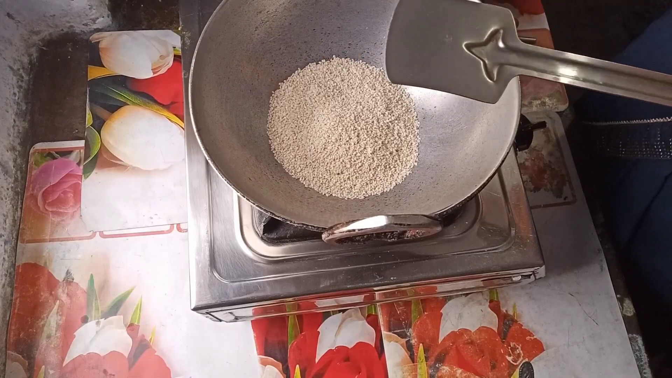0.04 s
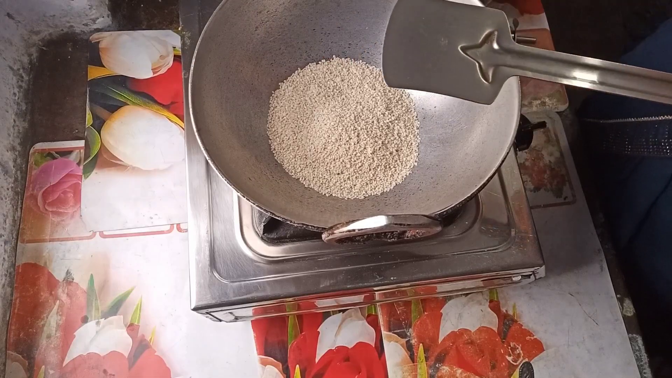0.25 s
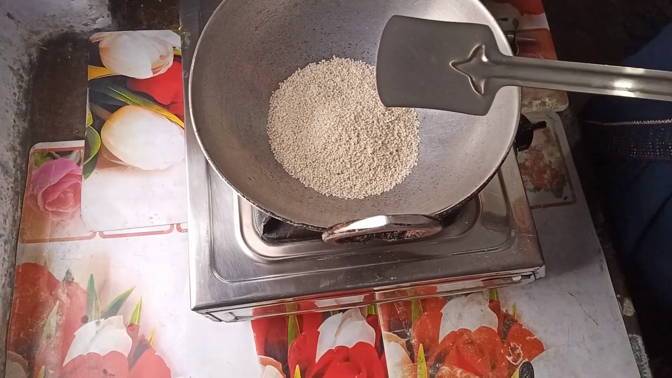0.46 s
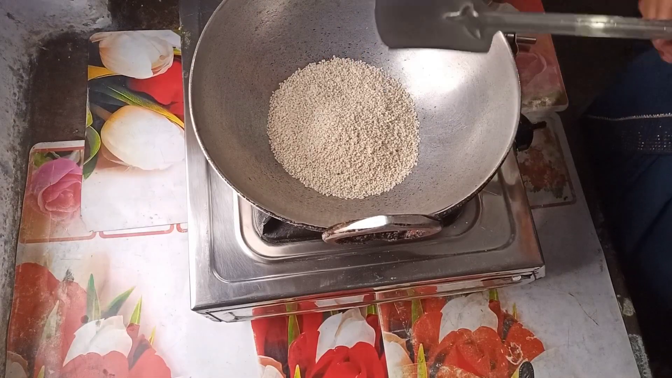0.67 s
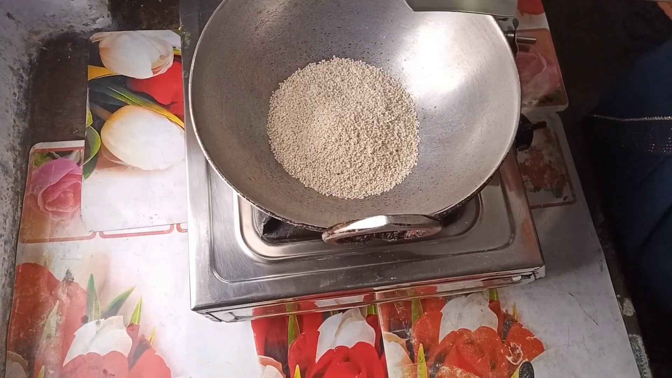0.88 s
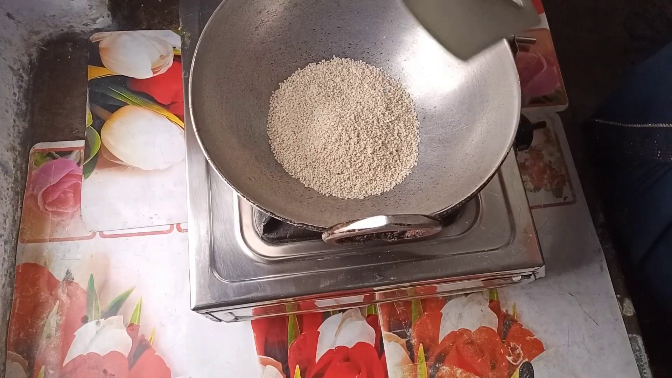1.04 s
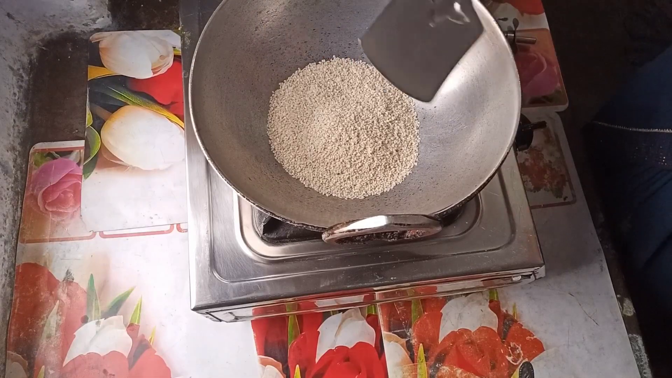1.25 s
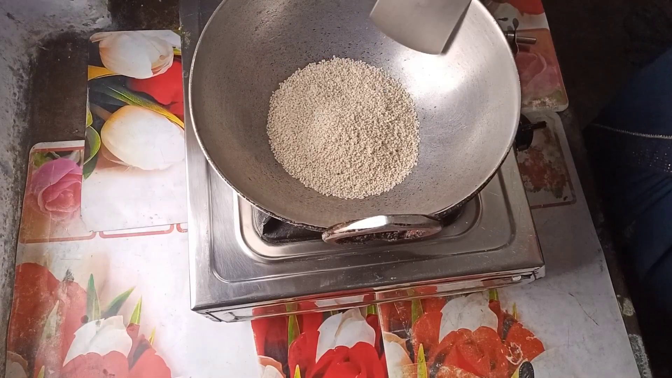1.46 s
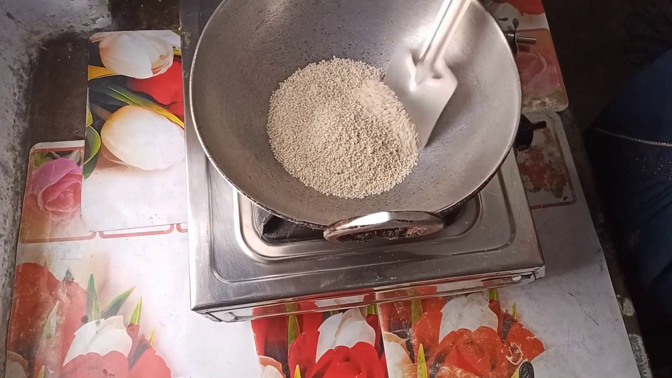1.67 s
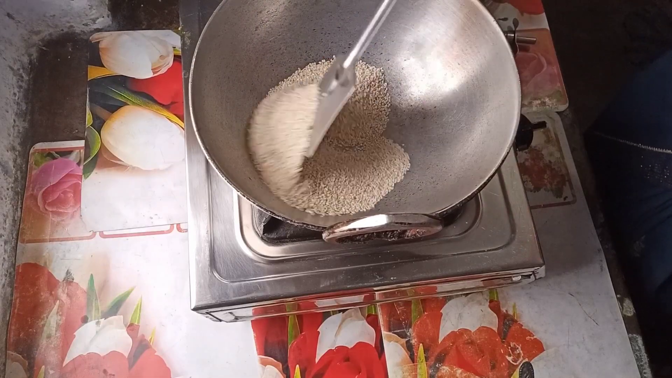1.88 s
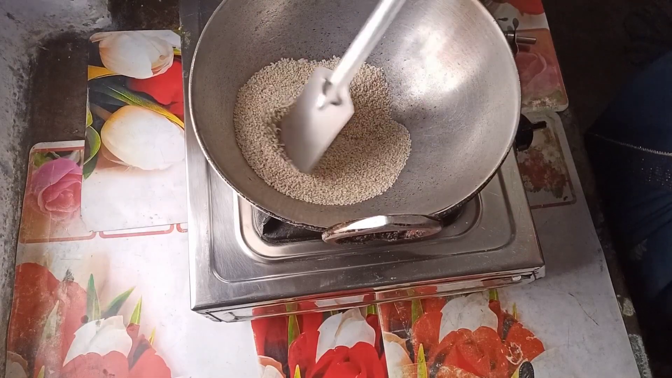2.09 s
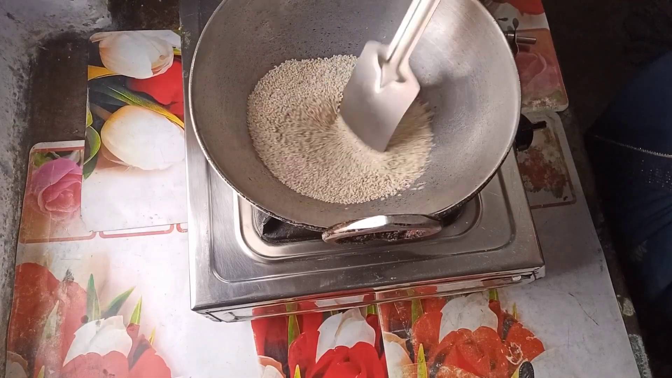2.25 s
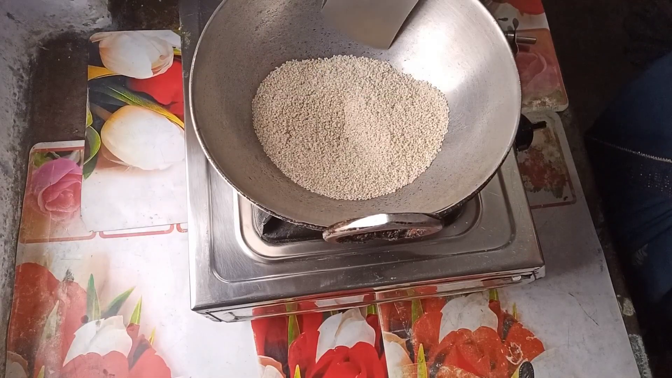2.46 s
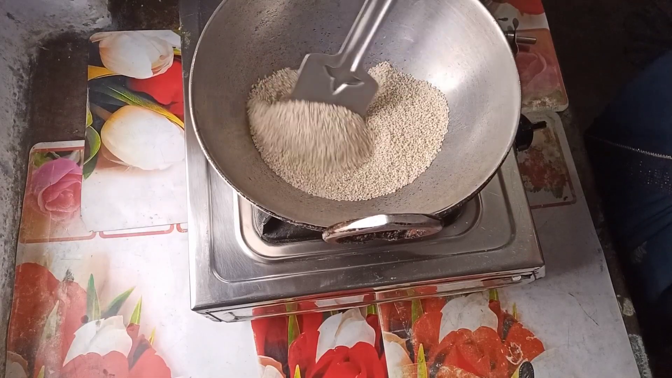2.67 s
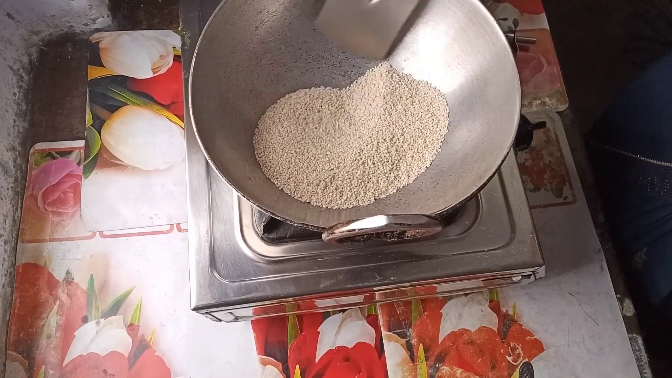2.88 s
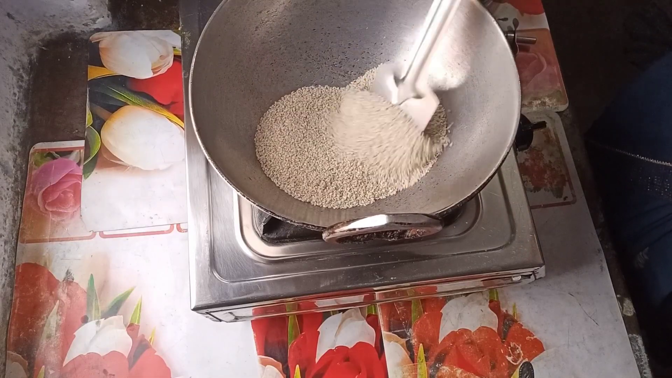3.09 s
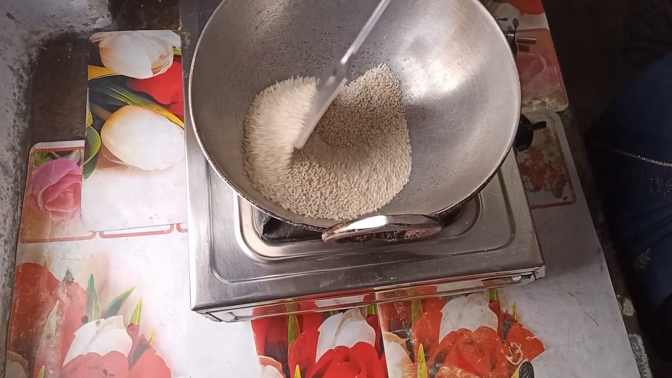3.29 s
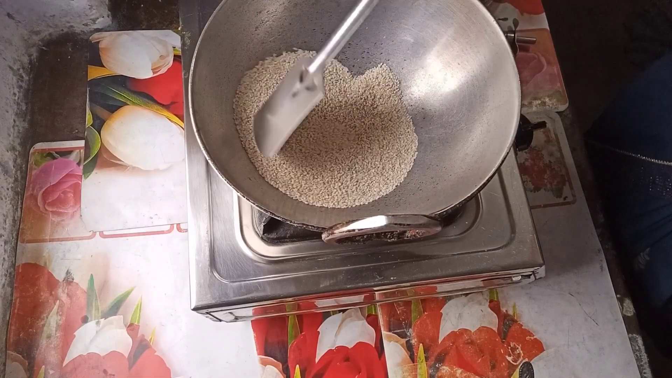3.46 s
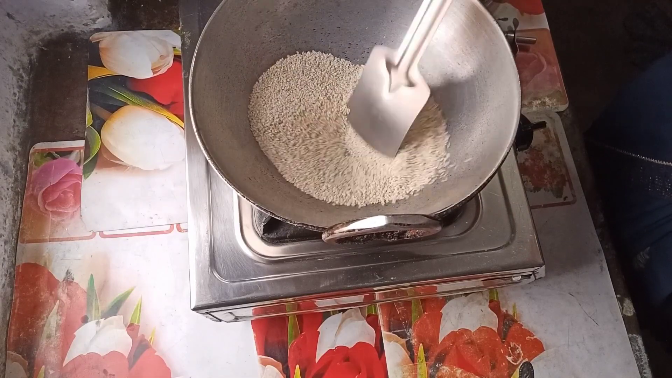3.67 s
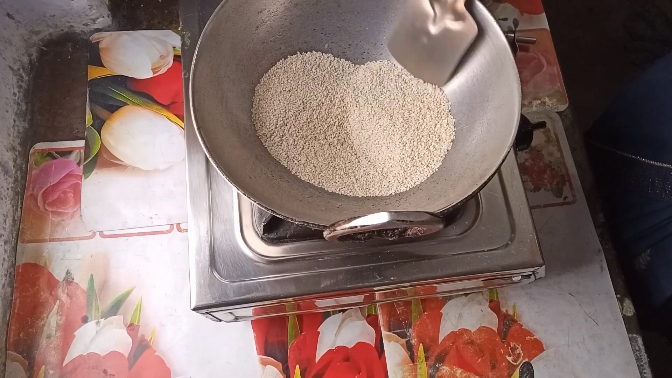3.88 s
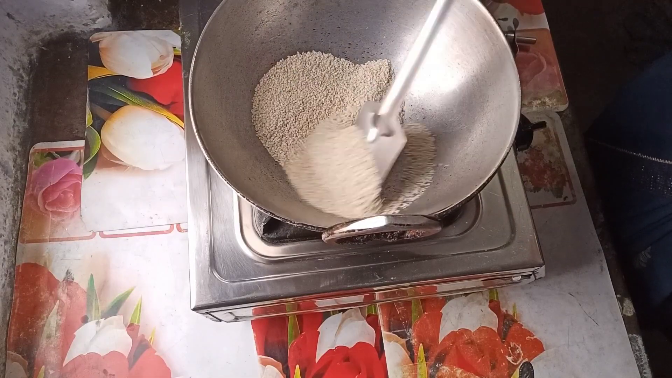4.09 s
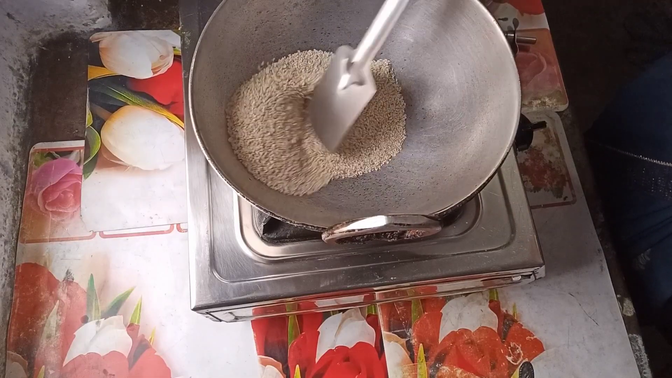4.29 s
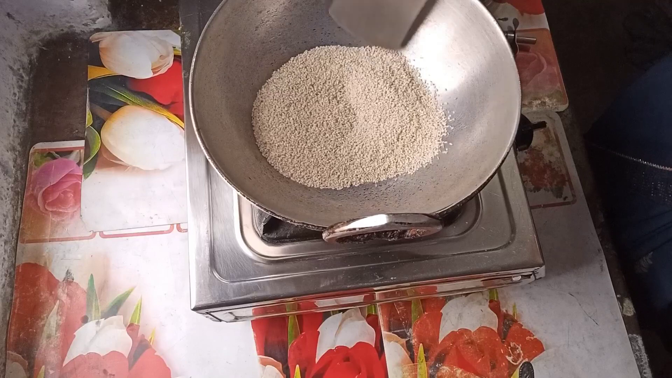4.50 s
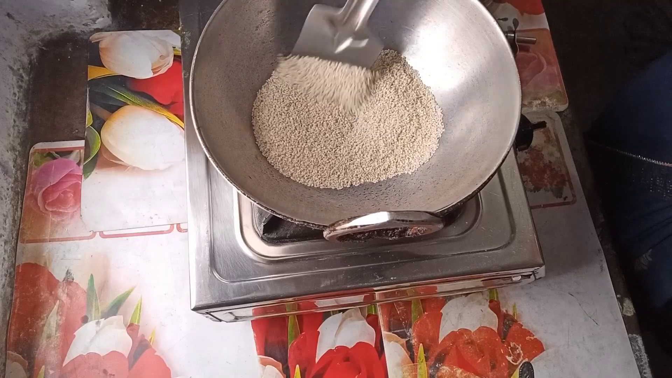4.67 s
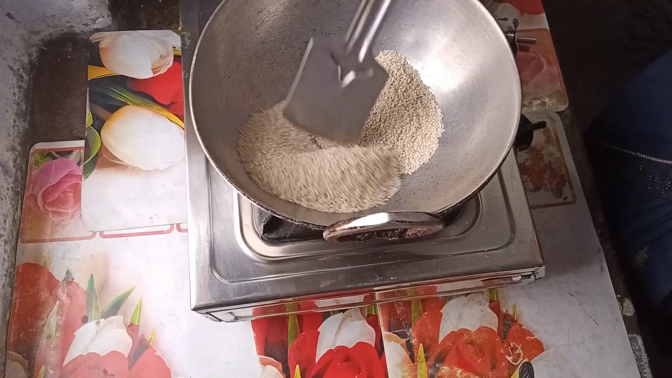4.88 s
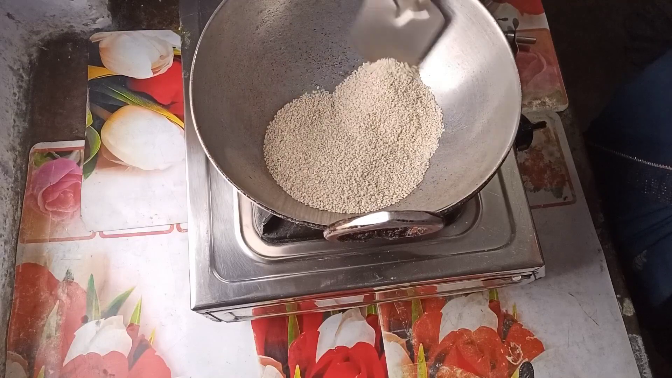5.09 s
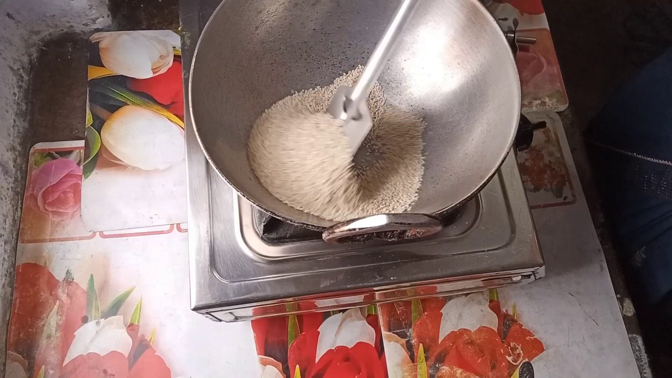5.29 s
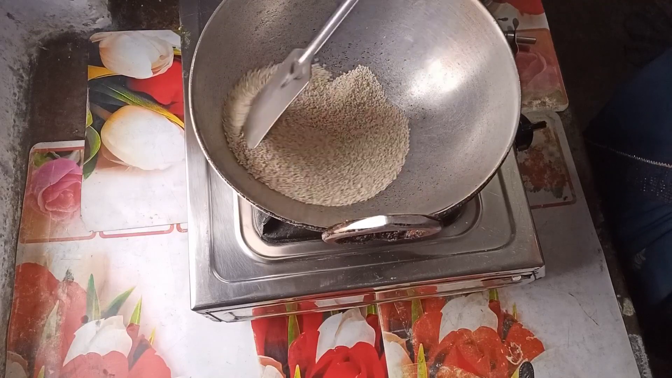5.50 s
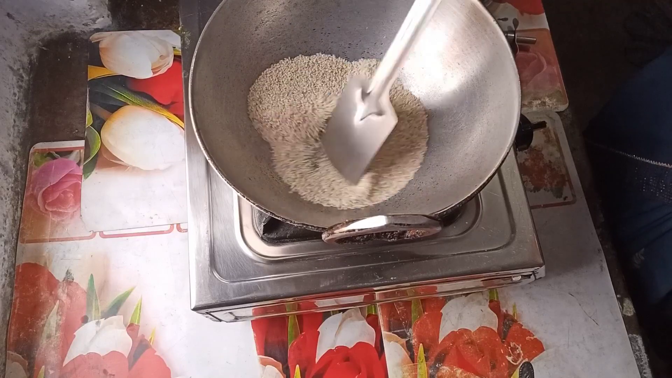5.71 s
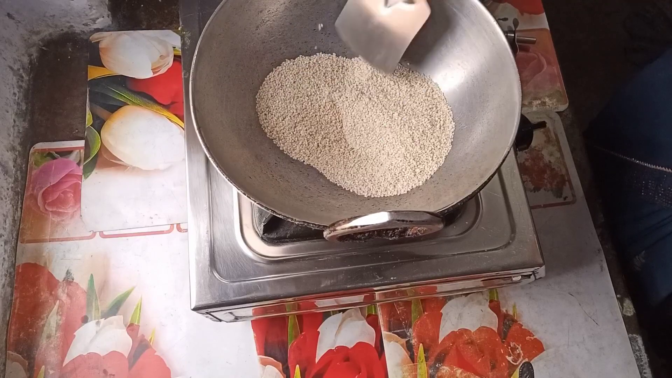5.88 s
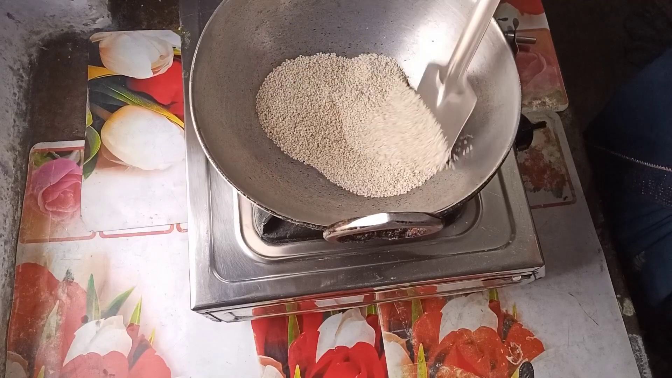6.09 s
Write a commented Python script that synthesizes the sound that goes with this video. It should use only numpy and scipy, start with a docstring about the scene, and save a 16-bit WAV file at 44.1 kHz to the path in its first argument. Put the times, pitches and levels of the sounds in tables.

```python
"""A low gas flame rushes under a round metal pan of dry seeds, heard from just above; a dull bump shakes
the stove (filtered noise with a dying ring), two dull rattles click with it, then a few lone seeds hop.
Then, stroke after stroke, a steel spatula strikes the wall (noise shell, damped modes, notes), scrapes
down it (stick-slip impulses ringing steel) and ploughs the heap: the pan rumbles under the blade and the
seeds hiss as they slide back (both filtered random impacts). Metal sounds leave a short room tail."""
import sys
import numpy as np
from scipy import signal
from scipy.fft import rfft, irfft, next_fast_len
from scipy.io import wavfile
from scipy.ndimage import map_coordinates

SR = 44100
rng = np.random.default_rng(int(sys.argv[2]) if len(sys.argv) > 2 else 0)


def persist_wave(psi):
    """Save psi, clipped to +-1, as 16-bit WAV."""
    counts = np.round(np.clip(psi, -1, 1) * 32767).astype(np.int16)
    wavfile.write(sys.argv[1], SR, np.atleast_2d(counts).T)


N = 271170


def amp(db):
    """Linear gain of a level in dB."""
    return 10 ** (np.asarray(db) / 20)


def unit(x):
    """Scale a sound to rms 1."""
    return x / np.sqrt(np.mean(x ** 2) + 1e-20)


def onset_unit(x):
    """Scale a blow to rms 1 over its first 20 ms."""
    return x / np.sqrt(np.mean(x[..., :SR // 50] ** 2))


def add(track, s, sound):
    """Mix a sound into the track at time s."""
    part = track[:, max(round(s * SR), 0):][:, :sound.shape[-1]]
    part += sound[..., :part.shape[-1]]


def along(points, hz):
    """Interpolate (Hz, value) points on a log frequency axis."""
    f, v = np.transpose(points)
    return np.interp(np.log(hz + 1), np.log(f + 1), v)


def below(hz, edge_hz):
    """1 under the edge, 0 over it, with a soft step."""
    return 1 / (1 + (hz / edge_hz) ** 8)


def lift(resonances, hz):
    """The gain in dB that (Hz, width, dB) resonances give."""
    return sum(db / (1 + (2 * (hz - f) / w) ** 2) for f, w, db in resonances)


def coloured(x, gain_db):
    """Put x through the causal, minimum-phase filter whose gain is gain_db(Hz)."""
    n = x.shape[-1]
    m = 2 * next_fast_len(n // 2 + 4096)
    gain = amp(gain_db(np.fft.rfftfreq(m, 1 / SR)))
    cepstrum = irfft(np.log(gain + 1e-6))
    # fold the cepstrum onto positive time to make the filter causal
    cepstrum[1:m // 2] *= 2
    cepstrum[m // 2 + 1:] = 0
    return irfft(rfft(x, m) * np.exp(rfft(cepstrum)), m)[..., :n]


def wobble(rate, size=N):
    """A smooth random curve, rate knots a second."""
    knots = rng.standard_normal(int(size * rate / SR) + 4)
    return map_coordinates(knots, [np.arange(size) * rate / SR])


def swells(rows):
    """The summed gain of smooth bell-shaped swells, each (middle s, half length s, dB)."""
    t = np.arange(N) / SR
    return sum(amp(db) * np.exp(-((t - s) / half) ** 2) for s, half, db in rows)


def contacts(rate, spread_db, size):
    """Tiny impacts at random times, rate a second, of uneven strength."""
    happens = rng.random(size) < rate / SR
    strength = amp(spread_db * np.clip(rng.standard_normal(size), -2, 2))
    return unit(happens * strength * rng.standard_normal((2, size)))


def dying(t60s):
    """Two crowds of modes too dense to tell apart, each band dying at its own speed."""
    hz, t, z = signal.stft(rng.standard_normal((2, SR * 3 // 4)), SR, nperseg=256)
    fade = amp(-60 * t / along(t60s, hz)[:, None])
    return signal.istft(z * fade, SR, nperseg=256)[1]


def touch_point(hz, depth_db, spacing_hz):
    """Each point of contact favours some clusters of modes and misses others (dB)."""
    favour = map_coordinates(rng.standard_normal(1024), [hz / spacing_hz], mode="mirror")
    return depth_db * np.clip(favour, -2, 1.5)


def spread(side, edge_hz, db):
    """The part of a sound that differs between the ears: treble only."""
    return coloured(side, lambda hz: db - 45 * below(hz, edge_hz) ** 2)


# the small hard room's decay: f/Hz, t60/s
ROOM_DECAY = [(200, 0.59), (3000, 0.44), (7000, 0.37), (14000, 0.27)]


def kitchen(x):
    """The short tail of a small hard room: the middle signal, a little late, through dying noise."""
    tail = dying(ROOM_DECAY)
    late = np.pad(x[0], (SR // 150, 0))[None]
    return signal.fftconvolve(late, tail / np.linalg.norm(tail[0]), axes=1)[:, :N]


# low resonances of the pan on its stand: f/Hz, width/Hz, lift/dB
PAN_RESONANCES = [(84, 6.4, 7.5), (119.6, 9.9, 9), (181.8, 19.6, 8.5), (251.4, 51, 11.5), (334.2, 25, 9.5),
                  (522, 26, 6), (585, 9.4, 12.5), (678, 57, 10), (800.6, 20, 7), (860, 9.6, 6),
                  (1047, 24, 2), (1238, 26, 9.5)]


def hollow(hz):
    """The lift in dB from the pan's low resonances."""
    return lift(PAN_RESONANCES, hz)


# burner spectrum: f/Hz, relative level/dB per Hz
FLAME_SPECTRUM = [(20, -20), (45, -6), (80, -1), (130, 1), (260, -4.5), (430, -3), (700, -12.5),
                  (1000, -18.5), (1800, -23), (3300, -24.5), (6500, -21.5), (8500, -28.5), (15000, -29)]


def flame(level_db=-62, pan_share=0.17):
    """The low, steady rush of the burner: noise that takes on a share of the pan's resonances."""
    rush = coloured(rng.standard_normal((2, N)), lambda hz: along(FLAME_SPECTRUM, hz) + pan_share * hollow(hz))
    return amp(level_db) * unit(rush)


# the stove is jolted and settles: t/s, level/dB, treble tilt/dB
BUMP_EVENTS = [(0.172, -27.5, -0.5), (.325, -35.5, -13.5), (.352, -38, -14)]
# struck stove spectrum: f/Hz, relative level/dB per Hz
STOVE_SPECTRUM = [(50, -50), (90, 5), (120, 10), (170, -5.5), (260, 3), (380, 2), (500, -4.5), (900, -3),
                  (1150, -4.5), (1400, 1.5), (1850, -6.5), (2700, -19.5), (6500, -19.5), (9000, -35.5)]
# the stove's ring: f/Hz, t60/s
STOVE_DECAY = [(120, 0.59), (400, 0.46), (1500, 0.49), (6000, 0.25)]
# resonances of the stove's panels: f/Hz, width/Hz, lift/dB
STOVE_PANELS = [(102, 6.6, -14), (141, 7.2, 3), (245.8, 7.3, 10.5), (390, 43, 4.5), (476, 22, -3),
                (576, 14, 10.5), (1845, 60, 9.5)]


def bumps(attack=0.001):
    """Soft, heavy knocks set the stove's sheet metal booming; attack in s."""
    out = np.zeros((2, N))
    for s, db, treble_db in BUMP_EVENTS:
        def colour(hz):
            treble = treble_db * (1 - below(hz, 940))
            return along(STOVE_SPECTRUM, hz) + lift(STOVE_PANELS, hz) + treble
        boom = coloured(dying(STOVE_DECAY), colour)
        rise = 1 - np.exp(-np.arange(boom.shape[1]) / SR / attack)
        add(out, s, amp(db) * onset_unit(boom) * rise)
    return out


# the blade's weight sets the bowl booming: t/s, relative level/dB
BOOM_EVENTS = [(1.553, -32.5), (2.198, -43), (4.172, -38), (5.101, -55)]
# the bowl's lowest modes: f/Hz, relative level/dB, t60/s
BOWL_MODES = [(187.5, -3, 0.29), (256, -21, 0.14), (329, -3, 0.5)]


def booms(swell=0.01):
    """The bowl's lowest modes swell (swell in s) and die away."""
    out, t = np.zeros((2, N)), np.arange(SR // 2) / SR
    ring = sum(amp(db - 60 * t / t60) * np.sin(2 * np.pi * hz * t) for hz, db, t60 in BOWL_MODES)
    for s, db in BOOM_EVENTS:
        add(out, s, amp(db) * 2 * ring * (1 - np.exp(-t / swell)))
    return out


# small clicks: two dull rattles as the stove is bumped, then lone seeds hopping:
# t/s, relative level/dB, edge tilt/dB
SMALL_CLICKS = [(0.314, -34.5, -36), (0.349, -27.5, -44), (0.8949, -52, 9), (0.9612, -42.5, -6),
                (0.981, -32, -8), (1.022, -44, 4), (1.3155, -34.5, 8), (1.3742, -28, -6),
                (3.4704, -26.5, 4), (4.4707, -28, -24)]
# seed spectrum, for small clicks and for the sliding heap: f/Hz, relative level/dB per Hz
SEED_SPECTRUM = [(650, -61), (1100, -28), (1500, -14), (2700, -22.5), (3500, -6), (4050, -12.5),
                 (4600, -0.5), (5600, 5), (7100, 7.5), (8600, -6), (10000, -5.5), (12100, -7.5),
                 (14200, -8.5), (16000, -32)]


def ticks(level_db=-15, ring_db=-24, edge_db=7):
    """Rattles and lone seeds click, the pan ringing faintly: a short and a longer noise decay."""
    out, t = np.zeros((2, N)), np.arange(SR // 8) / SR
    for s, db, edge in SMALL_CLICKS:
        fade = amp(-60 * t / 0.013) + amp(ring_db - 60 * t / 0.46)
        click = rng.standard_normal((2, len(t))) * fade
        click = coloured(click, lambda hz: along(SEED_SPECTRUM, hz) + (edge + edge_db) * (1 - below(hz, 7800)))
        add(out, s, amp(db + level_db) * onset_unit(click))
    return out


# the blade pushes into the heap, eases off on the way back and lifts (levels are relative):
# t/s, push/s, way back/s, hiss level/dB, rocking level/dB, drone level/dB, crunch level/dB
STIR_STROKES = [(1.193, 0.14, .12, -65, -48.5, -60.5, -59), (1.539, .65, 0.16, -34.5, -51.5, -46, -44),
                (2.528, 0.3, 0.2, -45, -52, -44.5, -44), (2.977, 0.27, 0.56, -35, -50, -42.5, -41.5),
                (3.96, 0.44, 0.14, -38, -50.5, -44.5, -42.5), (4.635, .38, 0.046, -37, -49.5, -44, -41.5),
                (5.097, 0.43, 0.35, -32, -50, -44, -43), (5.948, 0.11, 0.037, -57.5, -53, -49, -44.5),
                (6.071, 0.22, .05, -38, -57, -42.5, -41)]
GRIP_S, EASE_S, LIFT_DB_PER_S = 0.034, 0.19, 234  # the blade takes hold, eases off; the fade once it lifts
DRONE_EASE_DB, CRUNCH_EASE_DB, ROCK_EASE_DB = 10, 11.5, 2.5  # how far each softens as the blade eases
GATHER_S, SETTLE_DB_PER_S = .1, 13.5  # seeds get moving, then thin out ahead of the blade


def stirring():
    """Gains of hiss, rocking, drone and crunch: each stroke takes hold, pushes, eases off and lifts."""
    start, push, back, hiss_db, rock_db, drone_db, crunch_db = np.transpose(STIR_STROKES)[:, :, None]
    t = np.maximum(np.arange(N) / SR - start, 0)
    lifted = amp(-LIFT_DB_PER_S * np.maximum(t - push - back, 0))
    eased = np.clip((t - push) / EASE_S, 0, 1)
    grip = np.minimum(t / GRIP_S, 1)
    hiss = np.minimum(t / GATHER_S, 1) * amp(hiss_db - SETTLE_DB_PER_S * t)
    rock = grip * amp(rock_db - ROCK_EASE_DB * eased)
    drone = grip * amp(drone_db - DRONE_EASE_DB * eased)
    crunch = grip * amp(crunch_db - CRUNCH_EASE_DB * eased)
    # the loudest stroke wins at every moment
    return [np.max(gain * lifted, axis=0) for gain in (hiss, rock, drone, crunch)]


# the pan rocks on its stand: f/Hz, relative level/dB per Hz
ROCKING_SPECTRUM = [(25, -5), (45, -4.5), (65, -14), (80, -1), (120, -9), (145, -17.5), (220, -31)]
# the pan drones under the blade: f/Hz, relative level/dB per Hz
DRONE_SPECTRUM = [(90, -43), (150, -4.5), (180, 0), (260, -6.5), (340, -1), (420, -12), (600, -36.5)]
# seeds roll and crunch under the blade: f/Hz, relative level/dB per Hz
CRUNCH_SPECTRUM = [(280, -38.5), (420, 3), (560, 1), (720, -3), (950, -6), (1300, -14.5), (2200, -11),
                   (3200, -21.5), (5000, -49.5)]
# jammed seeds grind higher: f/Hz, relative level/dB per Hz
JAMMED_SPECTRUM = [(230, -30), (330, -1.5), (470, -1), (620, -3.5), (800, 0.5), (1000, -5.5), (1400, -11.5),
                   (2200, -16), (3200, -17), (5000, -43)]
# seeds jam under the blade and are ground along: middle t/s, half length/s, level/dB
JAM_SWELLS = [(2.68, 0.027, -39), (3.155, 0.028, -38.5), (4.285, 0.051, -30.5), (5.39, .1, -36)]


def plough(rock, drone, crunch, drone_db=-.5, crunch_db=-2.0, lumps_db=1.1):
    """Seeds roll and jam under the blade; their random impacts shake the pan's low resonances."""
    def shaken(shape):
        hits = contacts(2500, spread_db=2.0, size=N)
        return unit(coloured(hits, lambda hz: along(shape, hz) + hollow(hz)))
    roll = crunch * amp(crunch_db + lumps_db * wobble(30)) * shaken(CRUNCH_SPECTRUM)
    rumble = rock * shaken(ROCKING_SPECTRUM) + drone * amp(drone_db) * shaken(DRONE_SPECTRUM)
    grind = swells(JAM_SWELLS) * shaken(JAMMED_SPECTRUM)
    return rumble + roll + grind


# heaped seeds slide back down the wall: middle t/s, half length/s, relative level/dB
SEED_SLIDES = [(.355, 0.08, -53.5), (2.28, 0.084, -34.5), (3.43, .05, -40.5), (3.68, 0.094, -34.5),
               (4.44, 0.095, -34.5), (5.79, .11, -36)]
REST_DB = -76.5  # the faint hiss of the heap at rest, relative like the slides


def seeds(stirred, level_db=-1, flutter_db=0.84, hop_db=-12):
    """Seeds pour over each other, the denser the more of them move; a few hop on metal with brighter clicks."""
    flow = np.hypot(stirred, swells(SEED_SLIDES)) + amp(REST_DB)
    rate = 6000 + 20000 * np.sqrt(flow / flow.max())  # impacts a second
    # the division keeps the loudness even as the patter thickens
    patter = contacts(rate, spread_db=3, size=N) / np.sqrt(rate)
    touch = lambda hz: touch_point(hz, depth_db=4.0, spacing_hz=71.1)
    hiss = coloured(patter, lambda hz: along(SEED_SPECTRUM, hz) + touch(hz))
    hops = contacts(350, spread_db=2, size=N)
    hops = coloured(hops, lambda hz: along(SEED_SPECTRUM, hz) - 8 * below(hz, 8300))
    flutter = amp(level_db + flutter_db * wobble(30))
    return flow * flutter * (unit(hiss) + amp(hop_db) * unit(hops))


# the flat of the blade rubs with a hoarse whistle:
# start t/s, end t/s, start f/Hz, end f/Hz, level/dB, width/Hz (rate of the random wander)
BLADE_RUBS = [(1.323, 1.473, 3510, 2490, -57.5, 1012), (1.664, 1.824, 3440, 3370, -54, 60),
              (2.609, 2.715, 1763, 1733, -34, 107), (2.613, 2.716, 4640, 4860, -26, 70),
              (3.412, 3.641, 3200, 3400, -51, 888), (3.718, 3.84, 1420, 1406, -55, 412),
              (4.037, 4.6, 2080, 2067, -53, 255.6)]


def rubs():
    """Friction feeds one hoarse resonance, which shifts and stutters as the blade travels."""
    out = np.zeros((2, N))
    for start, end, start_hz, end_hz, db, width_hz in BLADE_RUBS:
        hz = np.linspace(start_hz, end_hz, int(max(end - start, .02) * SR))
        size = len(hz)
        hoarse = wobble(width_hz, size=size) + 1j * wobble(width_hz, size=size)
        stutter = amp(3 * wobble(70, size=size))
        carrier = np.exp(2j * np.pi * np.cumsum(hz) / SR)
        whistle = unit(stutter * np.real(hoarse * carrier))
        arch = np.sin(np.linspace(0, np.pi, size))
        add(out, start, amp(db) * arch * whistle)
    return out


# ring of blade and pan, before damping and scatter: f/Hz, relative level/dB, t60/s
STEEL_MODES = [(1265, -15.5, 0.37), (1394, -12.5, 0.48), (1780, -8.5, 0.6), (2275, -10.5, .35),
               (2300, -12, .5), (2666, 7, 0.036), (3210, -9, .3), (3460, -2, 0.19), (3930, 2.5, .15),
               (4550, 0.5, .25), (4940, -1.5, 0.23), (5000, 0.5, 0.14), (5300, -1, .2), (5500, -2.5, 0.66),
               (5700, 12, 0.33), (6100, 1, 0.13), (6100, 9.5, 0.24), (6300, 4, 0.19), (6970, -1.5, 0.38),
               (7340, 9, 0.4), (7830, -2, .2), (9830, 2, .22), (12800, -15, .16), (13900, -6, .18),
               (14840, -17, .2)]


def steel(damping, scatter_db):
    """The steel's clear modes; their strengths depend on where the blade touches."""
    t = np.arange(SR // 2) / SR
    hz, db, t60 = np.transpose(STEEL_MODES)[:, :, None]
    sizes = amp(db + scatter_db * rng.uniform(-2.8, 1, hz.shape))
    fade = amp(-60 * t * damping / t60)
    modes = sizes * fade * np.sin(2 * np.pi * (hz * t + rng.random(hz.shape)))
    side = rng.choice([-1, 1], len(modes)) @ modes
    return np.array([modes.sum(0), side])


# blade edge scrapes the metal, or briefly catches it through the seeds with a dull knock:
# t/s, length/s, level/dB, low grating tilt/dB
EDGE_SCRAPES = [(0.342, 0.024, -46, 6), (1.668, .025, -25.5, -6.5), (1.846, .02, -45.5, 49),
                (1.964, 0.012, -37.5, 3.5), (2.045, 0.017, -48.5, 20), (2.113, .017, -49.5, 16),
                (2.195, 0.024, -39, -1.5), (2.554, 0.096, -33, -4), (2.614, 0.023, -20, -6),
                (2.636, 0.041, -18, -2.5), (2.863, .021, -49, 13), (3.023, .045, -27, -11),
                (3.134, 0.054, -19.5, -6), (4.046, 0.012, -21.5, -12), (4.191, 0.11, -31, -18),
                (4.248, 0.11, -31.5, -5), (4.725, 0.034, -33.5, -7), (4.817, 0.016, -26.5, -1),
                (4.871, 0.025, -39.5, 3.5), (5.137, 0.034, -26, -9), (5.24, 0.047, -18, -5),
                (5.383, 0.062, -37.5, 7), (6.11, 0.032, -28, -11)]
# scraped steel spectrum: f/Hz, relative level/dB per Hz
GRATING_SPECTRUM = [(200, -56), (700, -6), (1200, -12), (1800, -7), (3200, -7), (4600, -2), (6200, 2),
                    (7300, -1), (8300, -14.5), (11000, -15), (12200, -19), (14200, -21), (15500, -40)]
BITE_SHARE = 0.19  # the part of a scrape over which the pressure builds


def scrapes(slip_rate=2500, release_t60=0.19, clear_db=-7, held_t60=0.085):
    """The edge sticks and slips; each slip rings the steel, damped by the pressure of the hand."""
    out, t = np.zeros((2, N)), np.arange(SR // 2) / SR
    for s, length, db, low_db in EDGE_SCRAPES:
        bite = np.minimum(t / (BITE_SHARE * length), 1)
        pressure = bite * amp(-60 * np.maximum(t - length, 0) / release_t60)
        slips = contacts(slip_rate, spread_db=1.0, size=len(t))[0]
        body = rng.standard_normal((2, len(t))) * amp(-60 * t / held_t60)
        touch = lambda hz: touch_point(hz, depth_db=-1.5, spacing_hz=113.2)
        body = coloured(body, lambda hz: along(GRATING_SPECTRUM, hz) + touch(hz))
        body = unit(body) + amp(clear_db) * unit(steel(2, scatter_db=4))
        # every slip sets off the whole ring (convolution)
        rasp = irfft(rfft(body) * rfft(slips), len(t))
        rasp = coloured(rasp, lambda hz: low_db * below(hz, 4500))
        add(out, s, amp(db) * pressure * unit(rasp))
    return out


# blade strikes the pan (levels and tilts are relative):
# t/s, level/dB, blade note f/Hz, blade note level/dB, clank tilt/dB, edge tilt/dB, t60/s
BLADE_STRIKES = [(1.1929, -22, 4870, -2, -15, -15.5, .2), (1.5382, -10, 6560, -4, -6.5, -7.5, 0.35),
                 (1.6271, -11.5, 4900, -5, -16.5, -15, 0.15), (2.5285, -10.5, 5540, -35, -15.5, -14, 0.58),
                 (2.979, -2, 7310, -30, -16, -12, .25), (3.1341, -9.5, 7010, 3.5, 7.5, -2.5, 0.092),
                 (3.9328, -42.5, 5550, -13, 19, 0.5, 0.16), (3.9605, -6, 6045, 4, -14, -10, 0.28),
                 (4.1608, -20.5, 5920, 0, -5.5, -13, 0.18), (4.6355, -10.5, 6140, 0.5, -11, -11, 0.24),
                 (4.808, -17.5, 5730, -9, -11, -33, 0.099), (5.02, -23, 6040, -20, -5, -20, 0.156),
                 (5.0994, .5, 5640, -6, -16, -10.5, 0.12), (5.9607, -33, 5870, -15, 3, -24, 0.17),
                 (6.0717, -7, 6070, -2, -18.5, -14, 0.15)]
# struck steel spectrum: f/Hz, relative level/dB per Hz
SHELL_SPECTRUM = [(60, -69), (120, -25), (200, -15.5), (700, -9), (1100, -16), (2400, -8.5), (3300, -11),
                  (4500, -3), (5800, 1), (7200, -1), (8300, -6), (10500, -8), (12300, -11), (14000, -5),
                  (15500, -25)]
PAN_NOTE_HZ, PAN_NOTE_DB = 2709, -12  # every blow wakes this note of the pan; relative level


def strikes(clear_db=-4, crack_t60=0.014, level_db=-11, clank_db=11, edge_db=9,
            attack=0.00044, free_t60=0.47):
    """Each blow: a crack, the pan's dense ring, clear modes, the pan's note and a blade note set by the spot."""
    out, t = np.zeros((2, N)), np.arange(SR // 2) / SR
    for s, db, high_hz, high_db, clank, edge, t60 in BLADE_STRIKES:
        fade = amp(-60 * t / t60)
        crack = amp(-60 * t / crack_t60)

        def colour(hz):
            low = (clank + clank_db) * below(hz, 3600)
            high = (edge + edge_db) * (1 - below(hz, 7100))
            return along(SHELL_SPECTRUM, hz) + low + high + touch_point(hz, depth_db=4.0, spacing_hz=88.9)
        shell = coloured(rng.standard_normal((2, len(t))) * np.hypot(fade, crack), colour)
        # a blow that dies faster than free_t60 damps the modes more
        clear = steel(free_t60 / t60, scatter_db=5)
        # the blade keeps chattering on the metal, which roughens the notes
        chatter = amp(2.5 * wobble(250, size=len(t)))
        slip = .6 * wobble(120, size=len(t))  # phase, rad
        blade_note = amp(high_db) * np.sin(2 * np.pi * high_hz * t + slip)
        pan_note = amp(PAN_NOTE_DB) * np.sin(2 * np.pi * PAN_NOTE_HZ * t + slip)
        notes = (blade_note + pan_note) * onset_unit(fade * chatter)
        blow = onset_unit(shell) + amp(clear_db) * onset_unit(clear)
        blow[0] += notes  # middle only
        add(out, s, amp(db + level_db) * onset_unit(blow * (1 - np.exp(-t / attack))))
    return out


def scene(room_db=-11):
    """Mix (middle, side) pairs: the pan is straight ahead; strikes and ticks get extra treble width."""
    blows = strikes() + ticks()
    metal = blows + scrapes() + rubs()
    stirred, rock, drone, crunch = stirring()
    heap = seeds(stirred) + plough(rock, drone, crunch)
    background = booms() + bumps() + flame()
    mid, side = metal + amp(room_db) * kitchen(metal) + heap + background
    # extra treble width for strikes and ticks, chosen by ear, fading after each stroke time
    since = np.arange(N) / SR - np.array(STIR_STROKES)[:, :1]
    flash = np.max((since > 0) * amp(-60 * np.abs(since) / .16), axis=0)
    side = spread(side, edge_hz=8100, db=-12) + spread(flash * blows[1], edge_hz=4100, db=-5.5)
    return np.array([mid + side, mid - side])


TOP_HZ = 15750  # upper band limit


def record(dry):
    """The microphone loses the deep bass; the recorder clips at full scale and cuts all above its band limit."""
    heard = signal.sosfilt(signal.butter(4, 62, "high", fs=SR, output="sos"), dry)
    m = next_fast_len(N + SR // 2)
    kept = np.fft.rfftfreq(m, 1 / SR) < TOP_HZ
    return irfft(rfft(np.clip(heard, -1, 1), m) * kept, m)[:, :N]


dry = scene()
out = record(dry)
persist_wave(out)
```